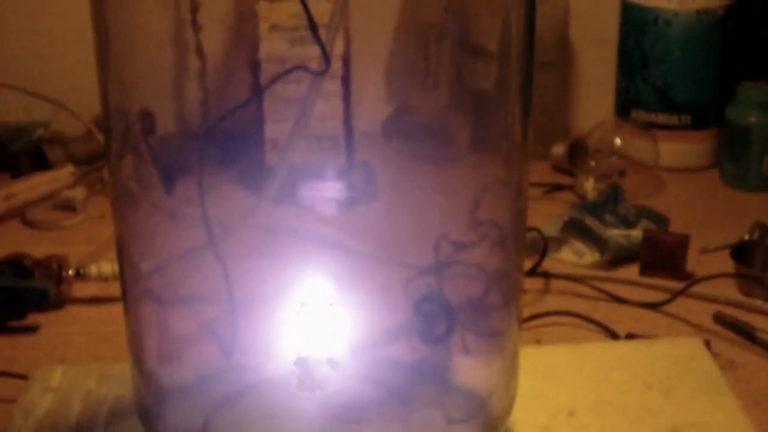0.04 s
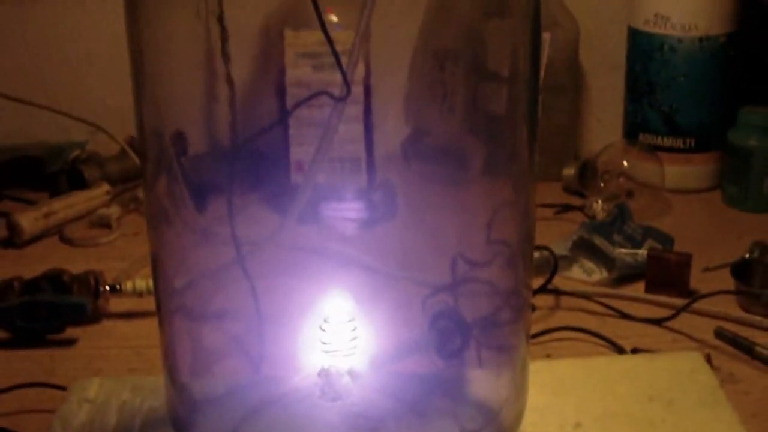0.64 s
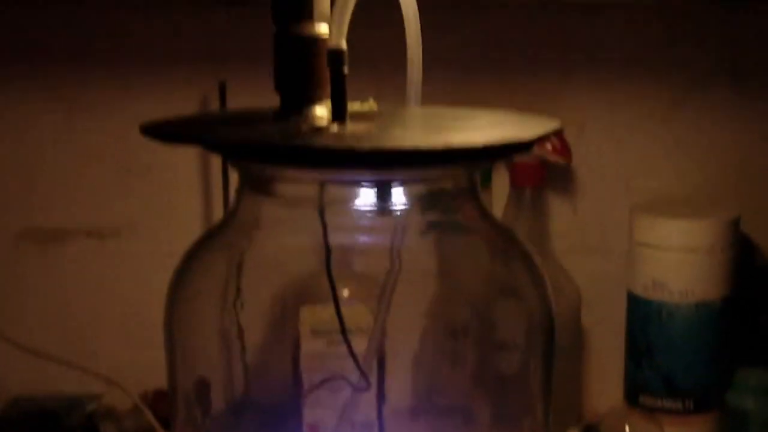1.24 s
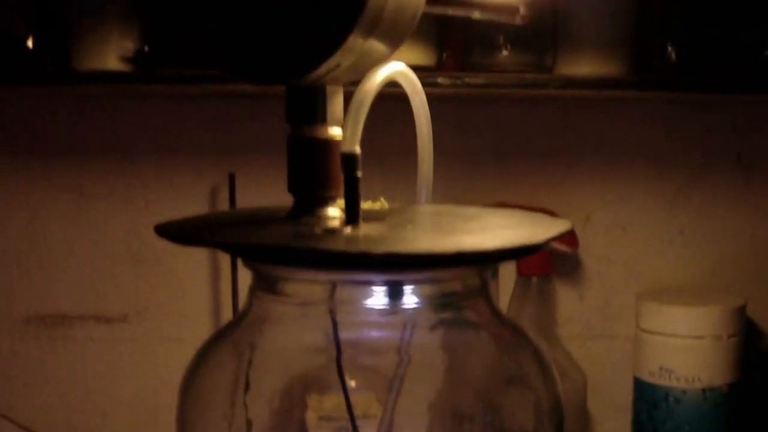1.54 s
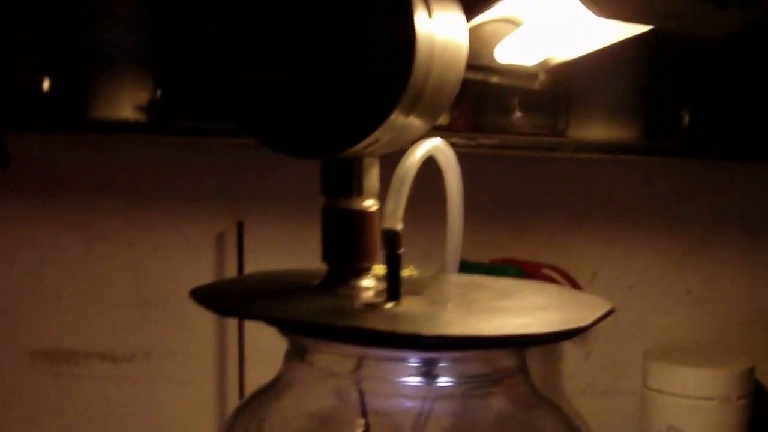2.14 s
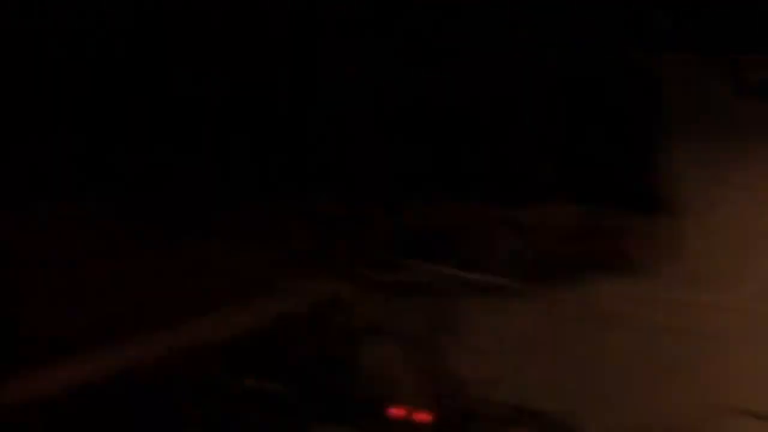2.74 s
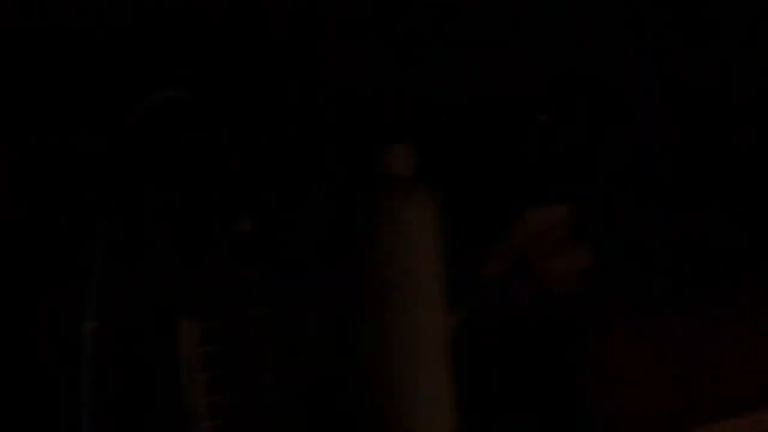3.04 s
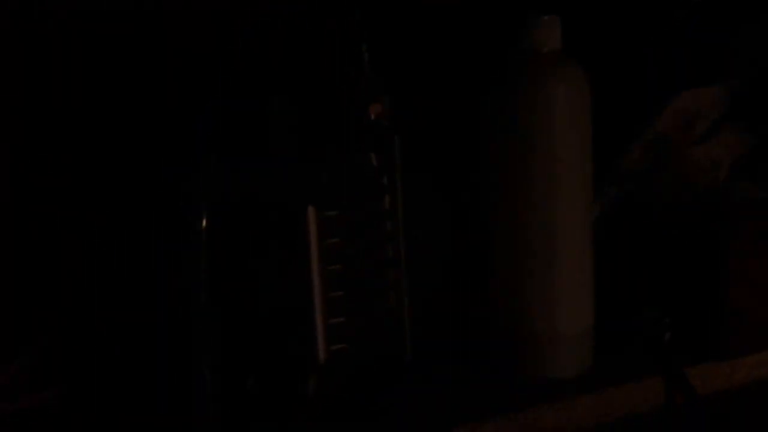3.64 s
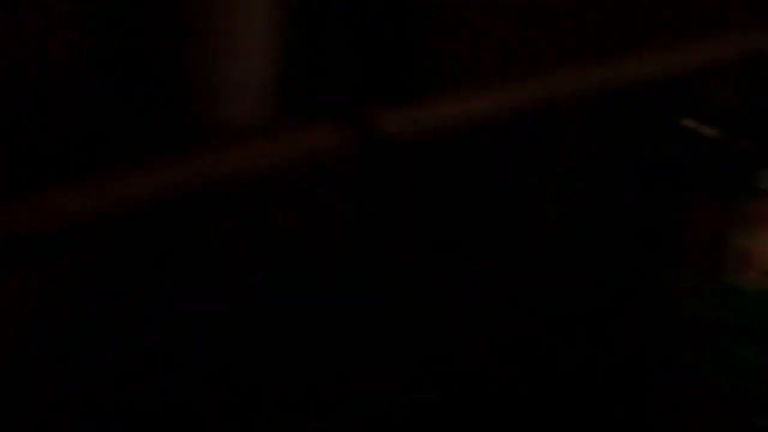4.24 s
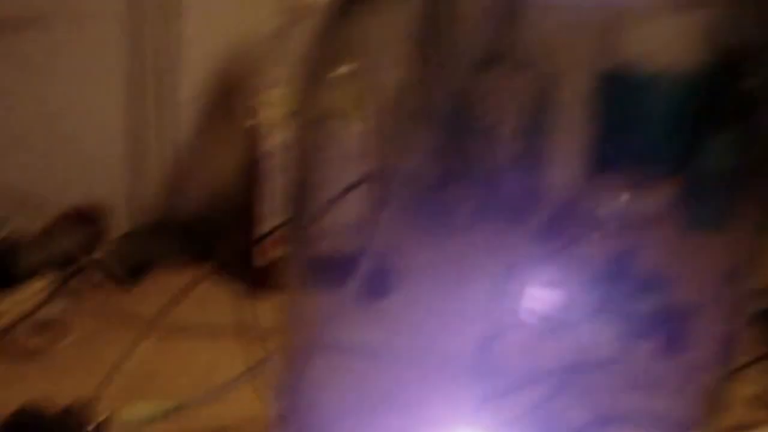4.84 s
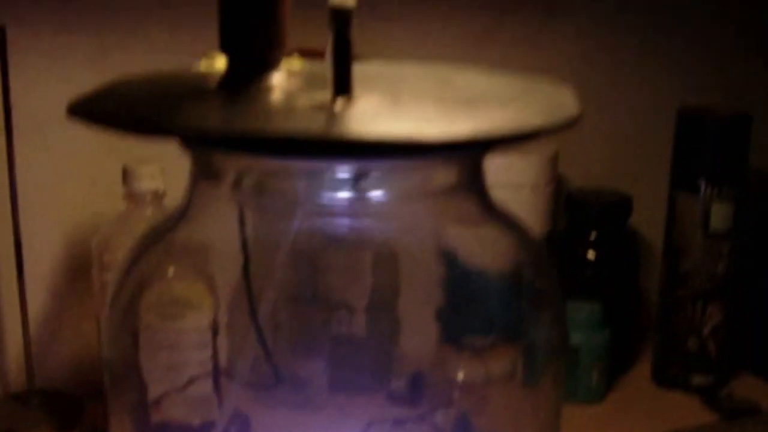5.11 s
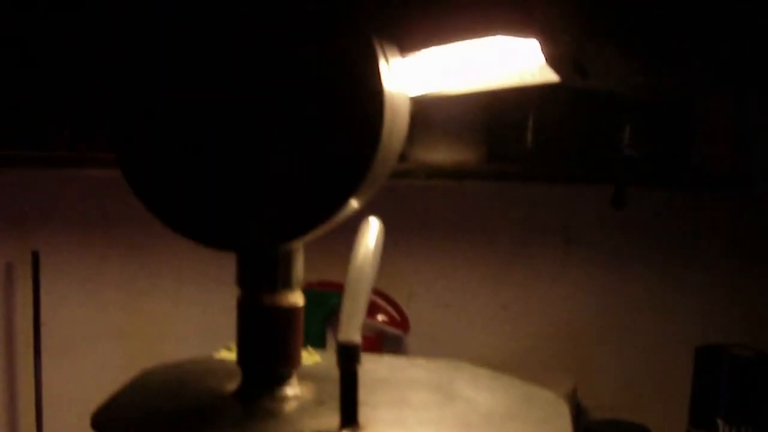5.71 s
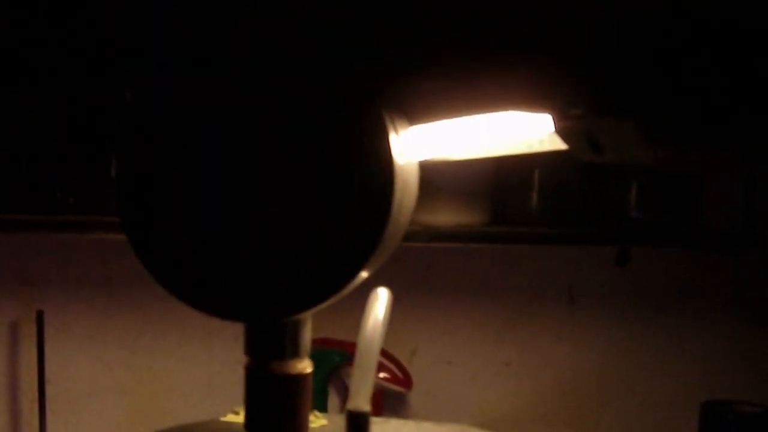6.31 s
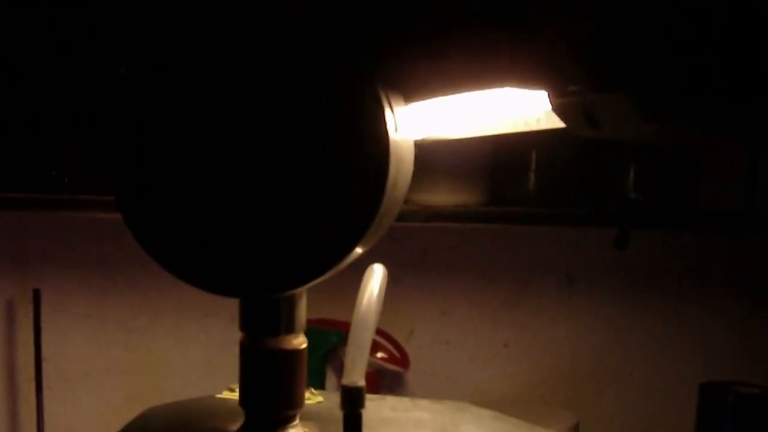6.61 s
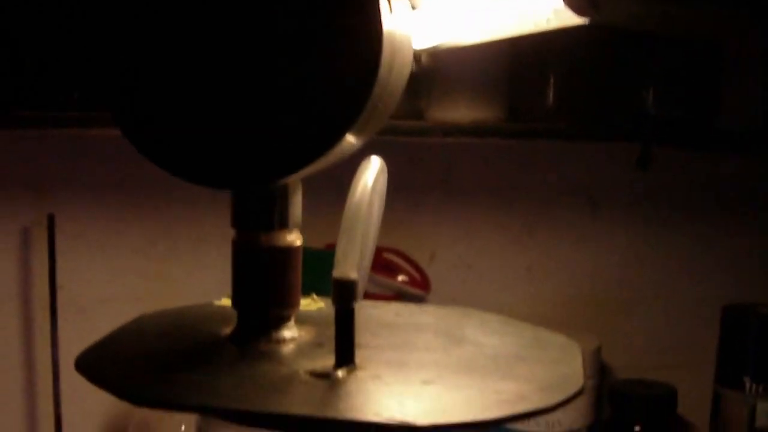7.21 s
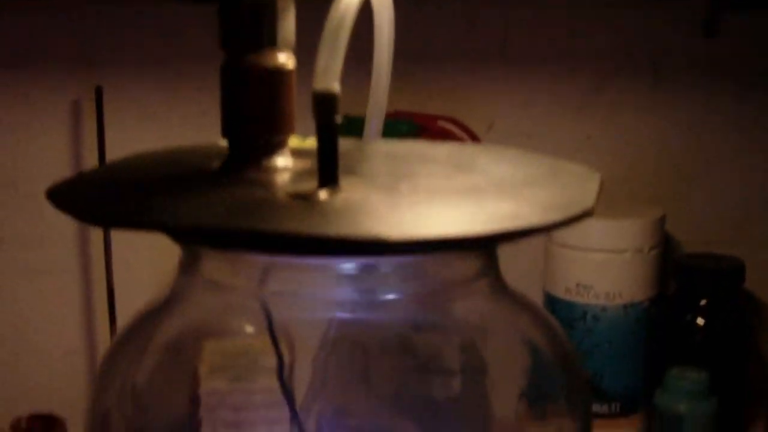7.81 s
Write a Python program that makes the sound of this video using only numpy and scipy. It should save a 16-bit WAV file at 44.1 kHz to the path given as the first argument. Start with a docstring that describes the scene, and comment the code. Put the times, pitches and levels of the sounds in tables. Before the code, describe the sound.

A vacuum pump clatters metallically in a workshop under a loud, crackling electrical buzz that dips midway and returns.

```python
"""Vacuum pump and glowing jar

A belt-driven vacuum pump clatters in a workshop as its valve and oil set its casing ringing.
A high-voltage discharge glows in a glass jar; its current pulses leak into the microphone as a buzz
that crackles whenever the discharge snaps. Midway the microphone swings to the pump and back: the
buzz sinks and the clatter brightens. Near the end something clicks close by."""
import sys
import numpy as np
from scipy import signal
from scipy.io import wavfile

SR = 44100
rng = np.random.default_rng(int(sys.argv[2]) if len(sys.argv) > 2 else 0)


def store_wav(level_fs):
    """Save 16-bit WAV to argv[1]."""
    pcm = np.round(np.clip(np.atleast_2d(level_fs), -1, 1) * 32767)
    wavfile.write(sys.argv[1], SR, pcm.T.astype(np.int16))


N = 355446
TIME = np.arange(N) / SR
MAINS_HZ, FIRST_PULSE_S = 50.042, .00068

# how far the microphone faces the pump: t/s, share (0 to 1)
FACING_PUMP = [(0, 0.25), (2.6, 0.39), (3.15, 0.88), (4.15, 0.81), (4.4, 0.4), (4.7, 0.03), (8.05, 0.07)]
# the pump's ringing notes, heard from the front: f/Hz, width/Hz, level/dB
FRONT_RINGING = [(1825, 8.2, -1), (2044, 26, -0.5), (2897, 55, 7.5), (3290, 16, -9), (3760, 40, -43)]
# tone colour of the pump's casing: f/Hz, level/dB
CASING_COLOUR = [(400, -23.5), (780, -5), (1150, -12.5), (1700, 1.5), (2100, -3.5), (2350, -8.5),
                 (2750, 0.5), (3400, -4), (3950, -11.5), (4600, -18), (5400, -38), (7000, -48),
                 (16000, -59)]


def amp(db):
    """Turns decibels into a gain."""
    return 10 ** (np.asarray(db) / 20)


def unit(x):
    """Scales a sound to an average power of 1."""
    return x / np.sqrt(np.mean(x ** 2) + 1e-20)


def curve(rows):
    """Joins (time, value) rows by straight lines, one value a sample."""
    return np.interp(TIME, *np.transpose(rows))


def ring(x, response):
    """Lets every sample of x set off a copy of the response."""
    return signal.oaconvolve(x, response)[:N]


def impulses(times, sizes):
    """Kicks one sample long, at the given times."""
    return np.bincount(np.round(np.abs(times) * SR).astype(int), sizes, N)[:N]


def colour(x, points, size=4096):
    """Shapes the bass and treble of x to follow (frequency, level) points."""
    hz, db = np.transpose(points)
    bins_hz = abs(np.fft.fftfreq(size, 1 / SR)) + 1
    log_gain = np.log(amp(np.interp(np.log(bins_hz), np.log(hz), db)))
    spectrum = np.exp(np.conj(signal.hilbert(log_gain)))  # nothing rings ahead of its cause
    return ring(x, np.fft.ifft(spectrum).real[:size // 2])


def resonances(modes, oil_damping_hz=14, size=3000):
    """How metal rings after one kick: a few notes, which oil makes fade sooner."""
    t = TIME[:size]
    response = np.zeros(size)
    for hz, width_hz, db in modes:
        damped_hz = width_hz + oil_damping_hz
        response += amp(db) * damped_hz * np.exp(-np.pi * damped_hz * t) * np.sin(2 * np.pi * hz * t)
    return response / np.linalg.norm(response)


def rattle(kicks, crack_s, tail_s, tail_db, size=4000):
    """Each kick lets off a short crack of noise and a longer tail from the bench and walls."""
    t = TIME[:size]
    power = np.exp(-2 * t / crack_s) + amp(tail_db) ** 2 * np.exp(-2 * t / tail_s)
    return np.sqrt(np.abs(ring(kicks ** 2, power))) * rng.standard_normal(N)


def background(room_db=-48, rumble_db=-44, whine_hz=7865, whine_db=-74):
    """Room noise, motor hum, a thin whine by the jar and rumble from the hand on the microphone."""
    # tone colour of the room noise: f/Hz, level/dB
    room_colour = [(30, -36), (120, -13), (300, -15.5), (550, 0), (800, 7.5), (1000, -7), (1300, -10),
                   (2500, -5), (4000, -26), (6000, -46), (10000, -29), (15500, -36)]
    # steady tones of the motor and pump: f/Hz, level/dB
    motor_tones = [(100.08, -49), (148, -55), (200.17, -50.5), (719.2, -57), (819.2, -56)]
    rumble_colour = [(10, 4), (25, -10), (50, -7), (90, -18), (300, -47), (1000, -76)]  # f/Hz, level/dB
    facing = curve(FACING_PUMP)
    room = amp(room_db) * unit(colour(rng.standard_normal(N), room_colour))
    hum = sum(amp(db) * np.sqrt(2) * np.sin(2 * np.pi * hz * TIME) for hz, db in motor_tones)
    whine = amp(whine_db - 6 * facing) * np.sqrt(2) * np.sin(2 * np.pi * whine_hz * TIME)
    rumble = unit(colour(rng.standard_normal(N), rumble_colour))
    return room + hum + whine + amp(rumble_db) * (facing + amp(-12)) * rumble


def click(start_s=7.5824, peak_db=-7.5, bounce_s=.00113, bounce_db=-10):
    """A small, hard click close by, with one bounce."""
    # its ringing notes: f/Hz, level/dB, time to fade by 60 dB/s
    click_notes = [(1820, -8, 0.0046), (2300, 6, 0.0045), (2820, 8.5, .006), (3860, -12, .004),
                   (4470, -8, .003), (5840, -11, .003), (7400, 0.5, 0.0042), (10800, -17, 0.0045),
                   (13900, -13, .003)]
    t = TIME[:1500]
    body = sum(amp(db - 60 * t / fade_s) * np.sin(2 * np.pi * hz * t) for hz, db, fade_s in click_notes)
    hits = impulses([start_s, start_s + bounce_s], amp([peak_db, peak_db + bounce_db]))
    return ring(hits, -body / abs(body).max())


def knocks(slap_db=-2, casing_db=-8, thump_db=3):
    """Now and then the valve slaps hard into the casing and thumps its duller body."""
    # hard knocks: t/s, slap level/dB, thump level/dB
    hard_knocks = [(0.587, -20, -34), (2.9846, -25, -35), (3.0044, -26, -39), (3.4421, -15, -38),
                   (3.8638, -19, -35), (4.339, -24, -32), (4.402, -21, -28), (4.4223, -22, -28),
                   (4.7361, -23, -34), (4.84, -19, -35), (4.8818, -20, -36), (5.0904, -22, -36),
                   (5.1323, -22, -37), (5.3834, -20, -39), (6.0706, -21, -35), (6.571, -21, -34),
                   (6.78, -19, -35)]
    # tone colour of the body: f/Hz, level/dB
    body_colour = [(700, -35), (1300, -16), (1650, -12), (2100, 4), (2600, -14), (5000, -45)]
    times, slap_levels, thump_levels = np.transpose(hard_knocks)
    slaps = rattle(impulses(times, amp(slap_levels + slap_db)), crack_s=.0028, tail_s=.016, tail_db=-11)
    thumps = rattle(impulses(times, amp(thump_levels + thump_db)), crack_s=.004, tail_s=.016, tail_db=-3)
    ringing = ring(slaps, resonances(FRONT_RINGING)) / 2
    return amp(casing_db) * colour(slaps, CASING_COLOUR) + ringing + colour(thumps, body_colour)


def belt(times, lap_hz=4.19, tight_s=.118):
    """The belt's pull swings from slack (-1) to tight (1) once a lap."""
    return np.cos(2 * np.pi * lap_hz * (times - tight_s))


def strokes(stroke_hz=47.945, first_s=.0018, belt_db=1, spread_db=1.42, jitter_s=.00008):
    """The pump's valve shuts once a stroke, harder and softer as the belt goes round."""
    times = np.arange(first_s, TIME[-1], 1 / stroke_hz)
    force, lateness = rng.standard_normal((len(times), 2)).T
    return impulses(times + jitter_s * lateness, amp(belt_db * belt(times) + spread_db * force))


def clack(hz, length_s, sweep_hz):
    """One clack of the valve: a short ring that starts softly and slides in pitch."""
    t = TIME[:round(length_s * SR)]
    cycles = (hz + sweep_hz * (t / length_s - 1) / 2) * t
    return np.sin(np.pi * t / length_s) ** 2 * np.sin(2 * np.pi * cycles)


def clatter(kicks, facing, level_db, cover_delay_s=.001951, cover_spread_db=3.5):
    """Valve clacks and churning oil ring the casing, which sounds different from side and front."""
    spatter = unit(rattle(kicks, crack_s=.0012, tail_s=.023, tail_db=-11.5))
    churn = rng.standard_normal(N)
    # from the side the clack is a short chirp
    side = amp(-4) * unit(ring(kicks, clack(hz=2613, length_s=.0027, sweep_hz=740)))
    side += amp(-2) * ring(unit(spatter + amp(-4) * churn), resonances(side_ringing()))
    # from the front the cover rings later, longer and less evenly
    cover = np.pad(clack(hz=2842, length_s=.0098, sweep_hz=-100), (round(cover_delay_s * SR), 0))
    uneven_kicks = kicks * amp(cover_spread_db * rng.standard_normal(N))
    front = amp(-7) * unit(ring(uneven_kicks, cover))
    front += amp(-4) * ring(unit(spatter + amp(-9) * churn), resonances(FRONT_RINGING))
    blend = amp(level_db) * (np.sqrt(1 - facing) * side + np.sqrt(facing) * front)
    return colour(blend, [(3800, 0.5), (6000, -2.5)])  # the heavy casing gives off little treble


def side_ringing():
    """The notes that the pump's casing gives off sideways."""
    # f/Hz, width/Hz, level/dB
    side_notes = [(1598, 3.4, -5.5), (1858, 3.3, -1.5), (2145, 116, -5), (2590, 75, 0), (2906, 10.3, 4)]
    return side_notes


def casing_wash(kicks, clatter_db, level_db=-48, usual_clatter_db=-40, follow_share=.099):
    """A broad rush of noise from the casing, which swells less than the clatter does."""
    wash = unit(rattle(kicks, crack_s=.00054, tail_s=.072, tail_db=4))
    churn = amp(2) * rng.standard_normal(N)
    swell_db = follow_share * (clatter_db - usual_clatter_db)
    return amp(level_db + swell_db) * unit(colour(wash + churn, CASING_COLOUR))


def valve_ticks(kicks, facing, level_db=-72, facing_boost_db=8):
    """The valve's fine ticks grow faster than the force of the stroke."""
    # tone colour of a tick: f/Hz, level/dB
    tick_colour = [(3000, -19), (5500, -17), (7000, -26), (8800, -8), (9900, 3), (11000, -2), (12100, 5),
                   (12700, 4), (13500, 5), (15500, -4)]
    ticks = rattle(kicks ** 2, crack_s=.0025, tail_s=.016, tail_db=-6)
    return amp(level_db + facing_boost_db * facing) * unit(colour(ticks, tick_colour))


def rasp(kicks, facing, level_db=-47):
    """From the front, each stroke opens with a bright metallic edge."""
    # its tone colour: f/Hz, level/dB
    edge = [(2000, -40), (3000, -11), (3220, 4), (3600, -10), (3900, -5), (4600, -43), (8000, -54)]
    bursts = rattle(kicks, crack_s=.0016, tail_s=.01, tail_db=2)
    return facing * amp(level_db) * unit(colour(bursts, edge))


def pump(belt_swell_db=1.4):
    """The same strokes drive all the pump's steady noises, which swell with each lap of the belt."""
    # loudness of the clatter as the microphone moves: t/s, level/dB
    clatter_levels = [(0, -44.5), (0.6, -41), (1.1, -43), (2.2, -45), (2.88, -43.5), (3.0, -37.5),
                      (3.9, -38.5), (4.3, -39), (4.8, -38.5), (5.15, -39), (5.5, -41), (5.9, -41.5),
                      (6.1, -39), (7.3, -41.5), (8.05, -37.5)]
    kicks, facing = strokes(), curve(FACING_PUMP)
    clatter_db = curve(clatter_levels) + belt_swell_db * belt(TIME)
    casing = clatter(kicks, facing, clatter_db) + casing_wash(kicks, clatter_db)
    return casing + valve_ticks(kicks, facing) + rasp(kicks, facing)


def stray_field(mains_db=-15.5, octave_db=-30):
    """The transformer's magnetic field hums, peaking just ahead of each current pulse."""
    angle = 2 * np.pi * MAINS_HZ * (TIME - FIRST_PULSE_S)
    return amp(mains_db) * np.cos(angle + np.pi / 8) + amp(octave_db) * np.cos(2 * angle)


def snaps(starts, sizes, crest_s=.00087, stray_chance=.12):
    """At the top of some pulses the current drops suddenly, which makes a bright crackle."""
    # bursts in which every pulse snaps: start t/s, length/s
    bursts = [(0, .05), (.09, .06), (.19, .04), (.43, .06), (.55, .04), (.65, .1), (.77, .1), (.97, .04),
              (1.05, .1), (1.33, .04), (1.45, .1), (1.57, .04), (1.79, .06), (2.05, .08), (2.19, .04),
              (2.37, .1), (2.55, .06), (2.75, .22), (4.71, .04), (4.77, .1), (4.89, .1), (5.19, .04),
              (5.29, .04), (5.39, .06), (5.69, .04), (6.11, .04), (6.19, .1), (6.37, .08), (6.49, .08),
              (6.59, .04), (6.73, .04), (6.97, .04), (7.05, .06), (7.25, .06), (7.51, .06), (7.69, .04),
              (7.79, .06), (7.97, .09)]
    # notes that a snap rings in the circuit: f/Hz, level/dB, fade time/s
    circuit_notes = [(712, -14.5, 0.0018), (2440, -14, 0.00045)]
    in_burst = sum((starts > begin) & (starts < begin + length) for begin, length in bursts) > 0
    snapping = in_burst | (rng.random(len(starts)) < stray_chance)
    t = TIME[:round(SR / MAINS_HZ)]
    drop = -sum(amp(db) * np.exp(-t / fade_s) * np.cos(2 * np.pi * hz * t)
                for hz, db, fade_s in circuit_notes)
    crackle = ring(impulses(starts + crest_s, snapping * sizes), drop)
    return colour(crackle, [(3000, -0.5), (8000, -2), (15000, -5)])  # the pickup softens the edge


def current_pulse(ring_hz=510, climb_hz_per_s=100000, ring_s=.0014, drain_s=.0017,
                  glow_s=.00515, fade_s=.0027):
    """One pulse of current through the jar, ringing faster as it drains away."""
    t = TIME[:round(SR / MAINS_HZ)]
    cycles = (ring_hz + climb_hz_per_s * t / 2) * t
    current = np.exp(-t / drain_s) - np.exp(-t / ring_s) * np.cos(2 * np.pi * cycles)
    return current * np.clip((glow_s - t) / fade_s, 0, 1)  # the glow goes out as the voltage falls


def buzz(boost_db=18, flicker=.013, snap_spread_db=2):
    """The discharge draws one pulse each mains cycle, and the microphone picks it up electrically."""
    # how strongly the supply leaks into the microphone: t/s, level/dB
    leak_levels = [(0, -29), (1.82, -33), (2.73, -32.7), (3.25, -46), (4.17, -45.5), (4.44, -39),
                   (4.82, -27), (5.0, -26.5), (5.56, -29.5), (6.14, -31), (6.95, -30.5), (8.05, -26.5)]
    starts = np.arange(FIRST_PULSE_S, TIME[-1], 1 / MAINS_HZ)
    wobble, snap_force = rng.standard_normal((len(starts), 2)).T
    current = current_pulse()
    pulses = ring(impulses(starts, 1 + flicker * wobble), current) - current.mean()
    crackle = snaps(starts, amp(snap_spread_db * snap_force))
    return amp(curve(leak_levels) + boost_db) * (pulses + crackle + stray_field())


def scene():
    """Adds up all the sources in one channel."""
    return (buzz() + pump() + knocks() + click() + background())[None]


def record(dry, cutoff_hz=15850):
    """Cuts away the very highest treble."""
    low_pass = signal.firwin(511, cutoff_hz, window=("kaiser", 9), fs=SR)
    return signal.oaconvolve(dry, low_pass[None], "same")


dry = scene()
out = record(dry)
store_wav(out)
```